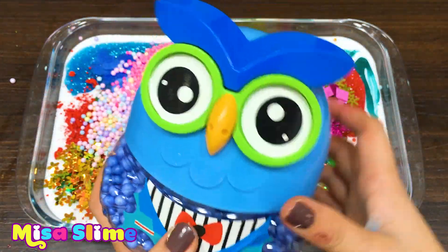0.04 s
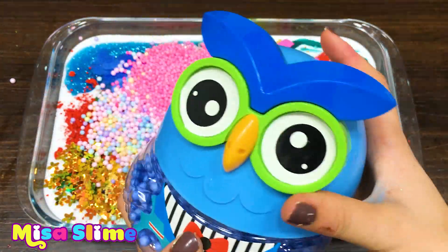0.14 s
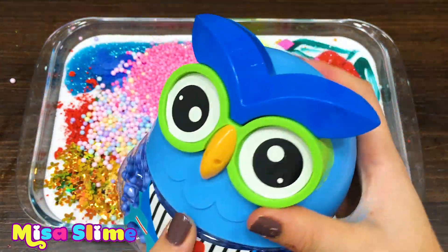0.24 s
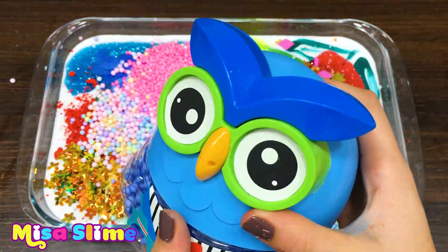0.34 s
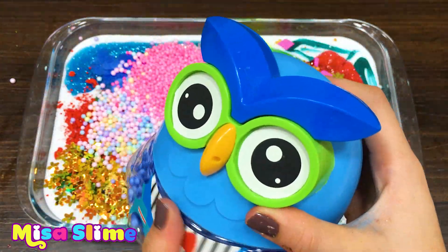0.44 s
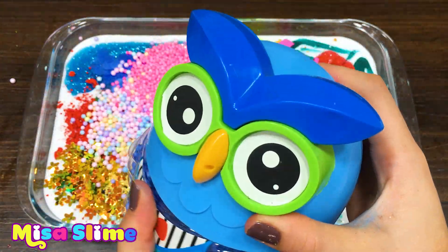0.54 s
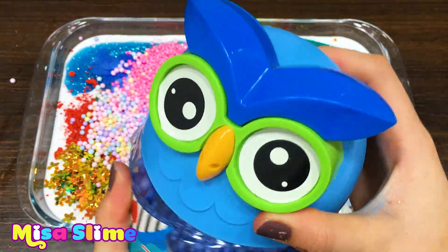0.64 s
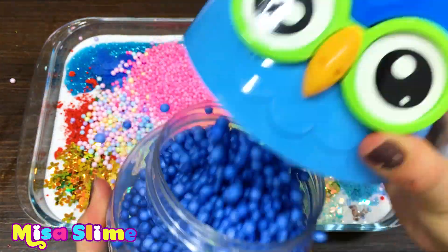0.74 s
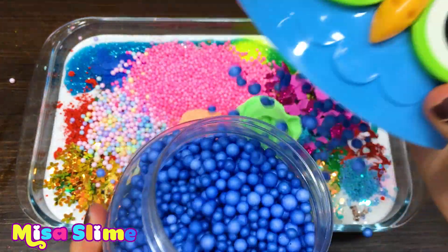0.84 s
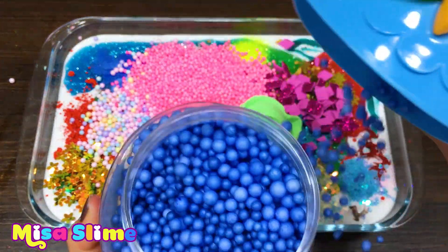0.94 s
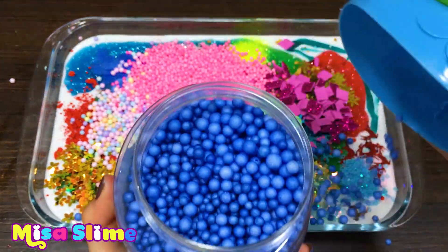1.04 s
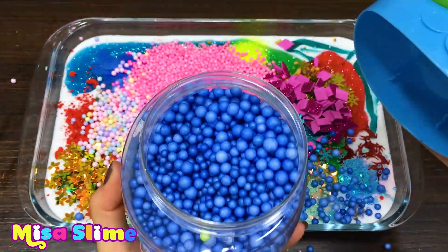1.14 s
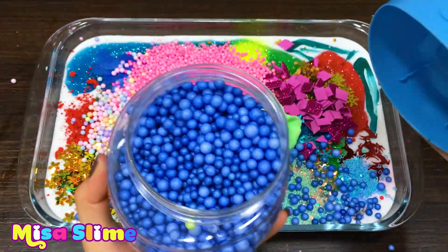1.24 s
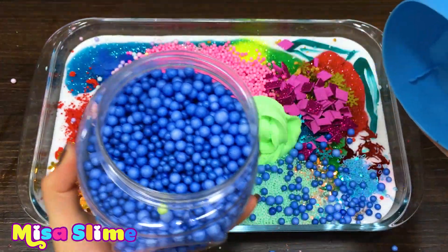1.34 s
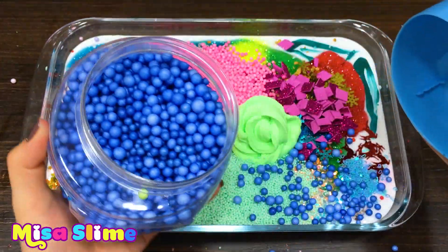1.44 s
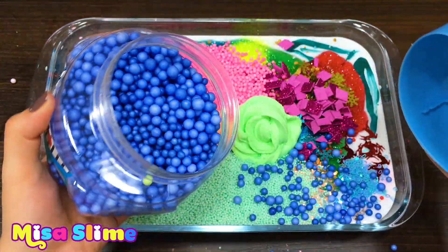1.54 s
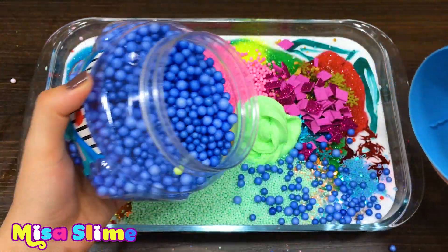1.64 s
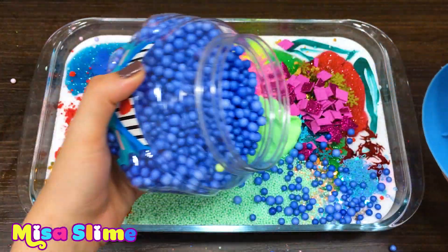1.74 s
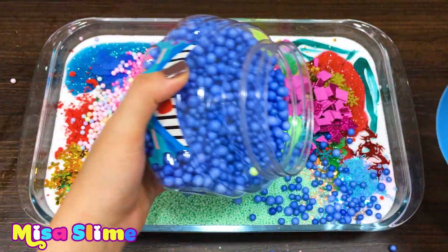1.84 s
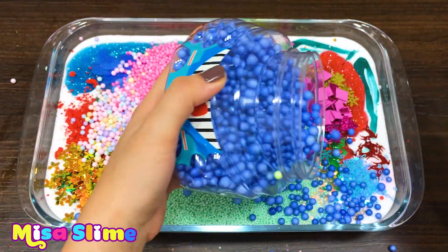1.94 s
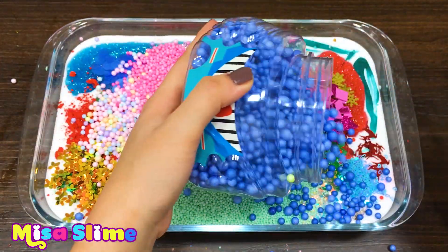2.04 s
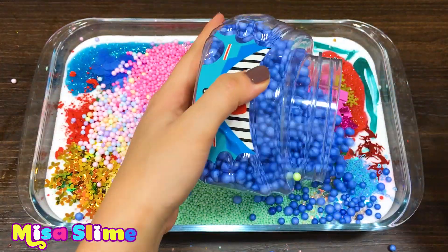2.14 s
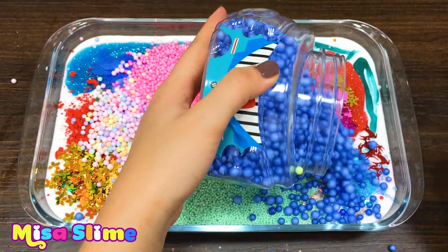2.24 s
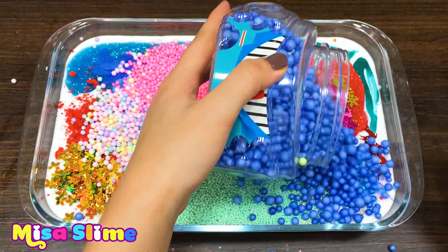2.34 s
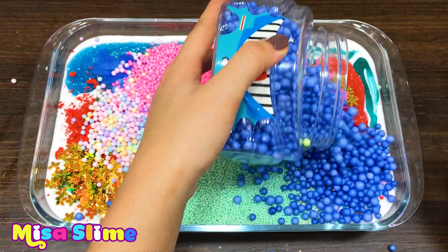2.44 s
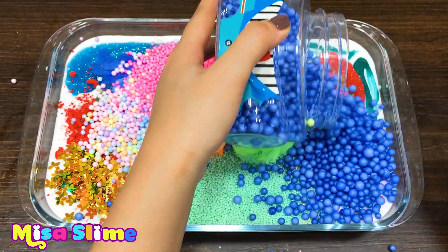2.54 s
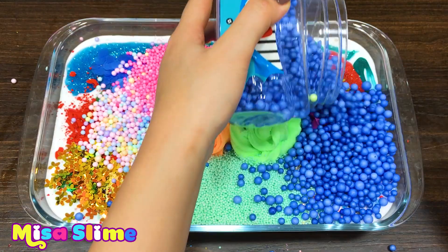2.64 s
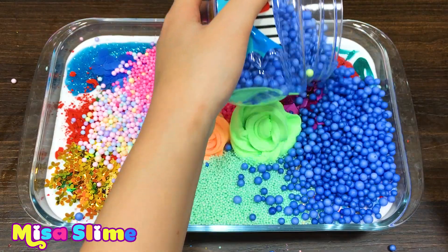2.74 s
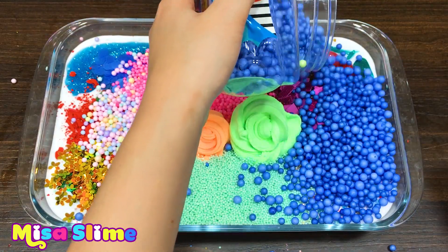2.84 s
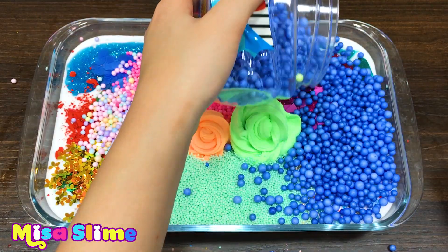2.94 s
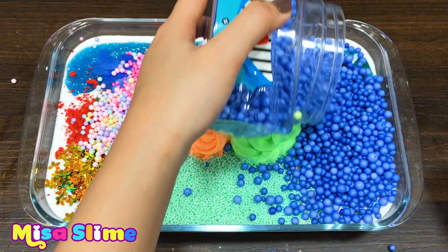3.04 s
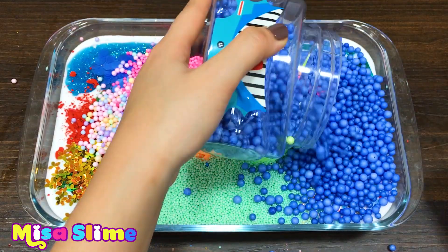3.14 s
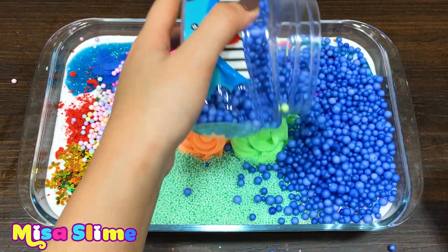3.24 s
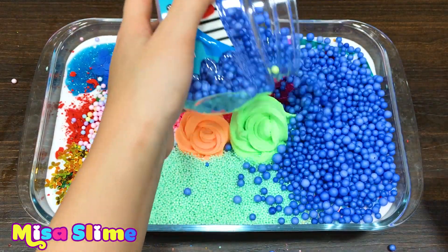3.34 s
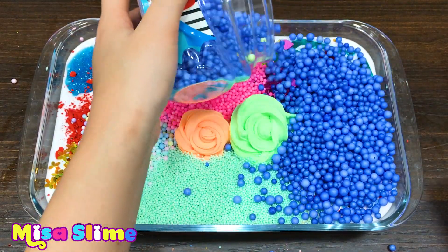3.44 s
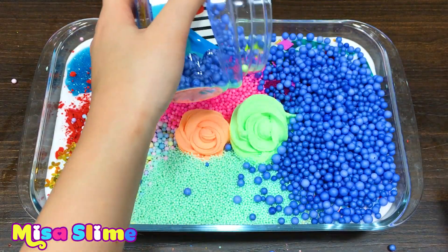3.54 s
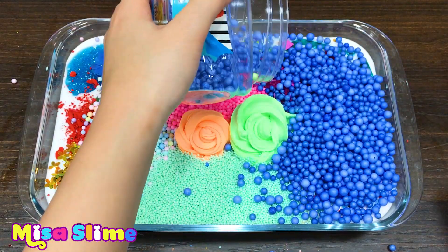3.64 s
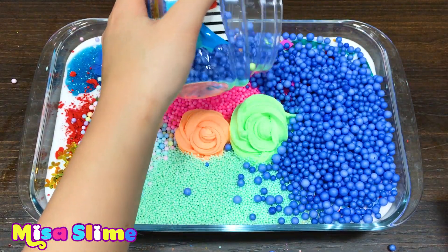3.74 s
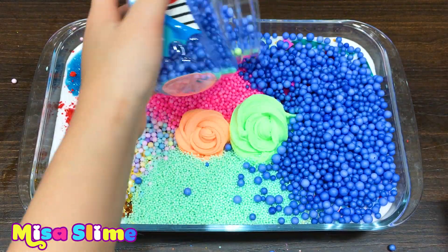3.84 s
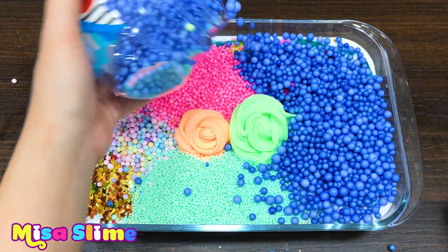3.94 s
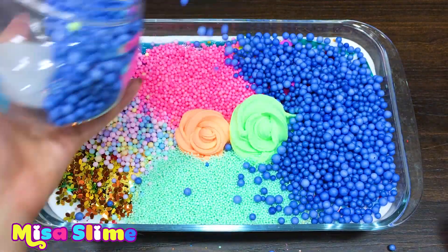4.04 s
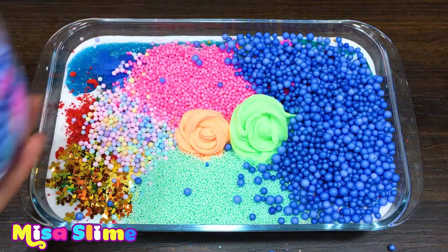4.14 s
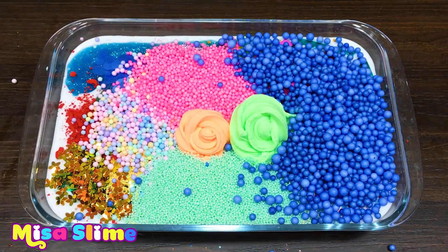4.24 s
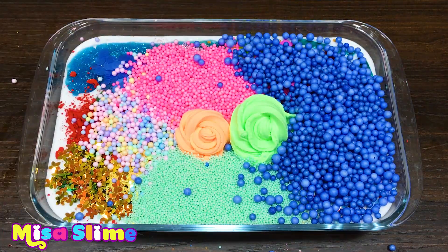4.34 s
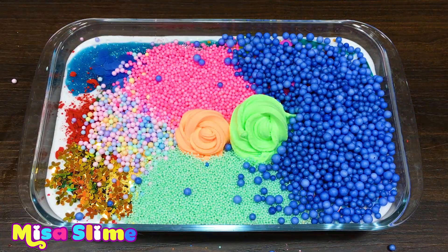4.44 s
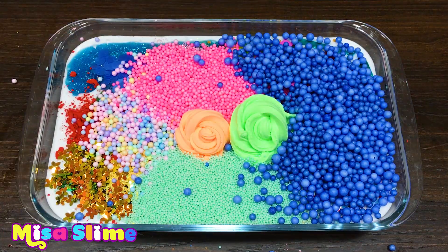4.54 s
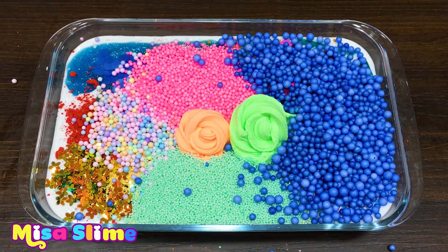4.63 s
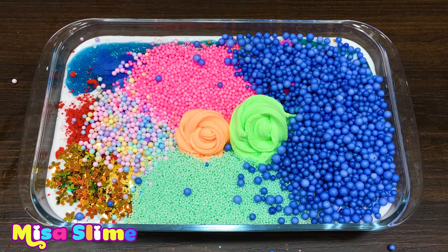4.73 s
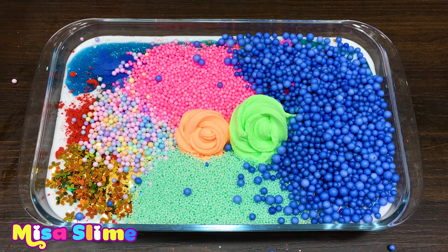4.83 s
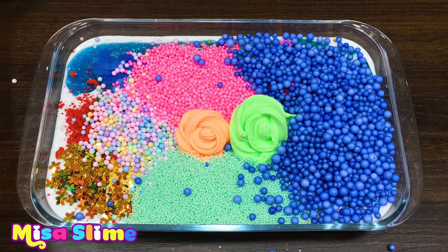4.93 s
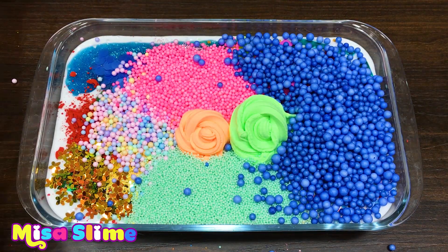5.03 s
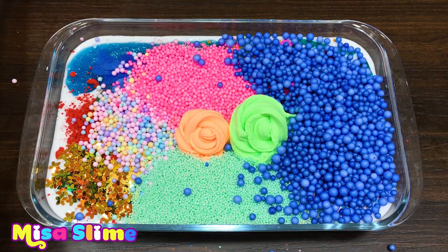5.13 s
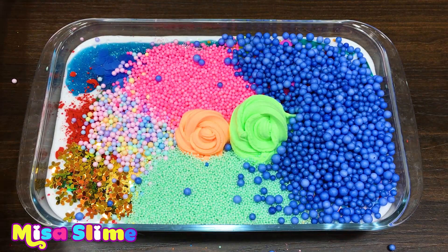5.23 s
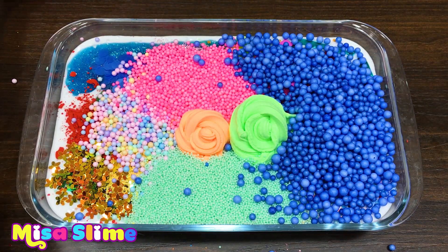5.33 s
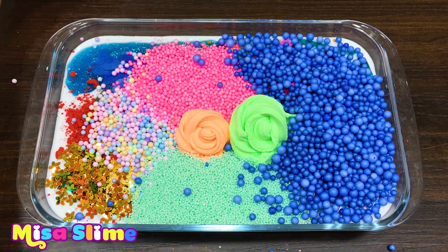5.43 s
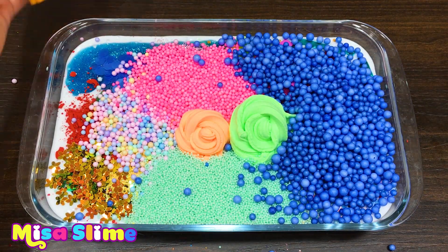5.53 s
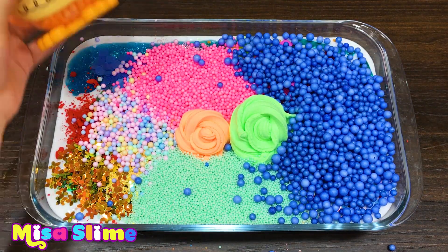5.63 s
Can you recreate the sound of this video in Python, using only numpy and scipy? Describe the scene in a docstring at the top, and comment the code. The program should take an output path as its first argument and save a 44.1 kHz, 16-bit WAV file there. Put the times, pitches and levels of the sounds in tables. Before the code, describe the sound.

Fingers rub a plastic jar, and its lid creaks, catches and comes off with two loud, hollow snaps. Small foam beads rustle and tick inside, then pour onto soft slime in a fine hiss with faint squeaks. The remaining beads slide back, the jar judders lightly onto a table, and something scrapes briefly. The microphone is close, in a bare, echoing room.

```python
"""A plastic jar of foam beads is handled close to a microphone in a bare, echoing room.
First fingers rub the plastic, and the lid creaks, catches on the rim and snaps off, ringing the jar.
Next the beads rustle and squeak, then pour onto soft slime: thousands of tiny clicks make a fine hiss.
Then the jar is swung upright and set down to one side, where its base judders to rest.
Last, something scrapes over the table. Soft room air and a low rumble lie under it all."""
import sys
import numpy as np
from scipy import signal
from scipy.io import wavfile
from scipy.ndimage import uniform_filter1d

SR = 44100
rng = np.random.default_rng(int(sys.argv[2]) if len(sys.argv) > 2 else 0)


def int16_out(signal):
    """Quantize to a 16-bit WAV file."""
    q = np.round(np.clip(np.atleast_2d(signal).T, -1, 1) * 32767)
    wavfile.write(sys.argv[1], SR, q.astype(np.int16))


N = 250488
TIME = np.arange(N) / SR

# Levels in the tables are relative. A ring time is how long a note takes to fade by 60 dB.
# the lid catching on the rim: (time [s], shell ring [dB], crack [dB], air thump [dB], shell pitch [x])
LID_SNAPS = [(0.5031, -40.5, -31.5, -67.5, 1.1), (.533, -39.5, -31, -70, 0.92),
             (0.5522, -42.5, -36, -69, 1.05), (.6074, -12, -23, -45, .95), (0.6132, 0, .5, -12, 1.0),
             (0.7744, -19.5, -34.5, -15.5, 0.94), (.784, -22.5, -32, -25.5, 0.81),
             (0.8161, -18, -29, -15, .99), (.8400, -5, -4.5, -9, .98), (0.844, -13, -14, -22.5, .93)]
LID_OFF_S = .83  # from here on, snaps ring the open mouth more than the air under the lid
# notes of the lid's shell, the air under it and the open jar: (pitch [Hz], level [dB], ring time [s])
SHELL_NOTES = [(890, -19, 0.012), (1176, 2.5, 0.03), (1312, -2, 0.035), (1540, -3.5, 0.022),
               (1783, 1, 0.04), (2167, -7, 0.054), (2400, -9.5, 0.043), (2810, -9, 0.052),
               (3120, -5, 0.0081), (3500, -15.5, 0.034), (4740, -10.5, 0.023), (5260, -7.5, 0.024),
               (7920, -13, 0.022), (10150, -11, .006)]
TRAPPED_AIR_NOTES = [(278, -5, 0.047), (370, 0.5, 0.064), (417, -6.5, 0.051), (491, -10.5, 0.11)]
MOUTH_NOTES = [(411, -2.5, 0.096), (508, -11.5, 0.13), (641.8, 2, 0.11), (730, -8.5, 0.094)]
# tone of the cracking plastic: (frequency [Hz], level [dB])
CRACK_TONE = [(200, -14), (700, -5), (1000, -3), (1400, 0), (3000, -1), (3900, -6.5), (5200, -4.5),
              (8000, -4.5), (12000, -11.5), (16000, -21)]

# beads sliding as the jar is gripped, jolted, tipped, shaken or righted:
# (time [s], rise [s], hold [s], fade [dB/s], hiss [dB], jar ring [dB])
BEAD_SLIDES = [(-.1, .1, .1, 40, -73, -70.5), (.25, .19, .01, 190, -56, -70), (.6, .05, .56, 105, -51, -68),
               (1.77, .4, 1.36, 50, -61, -64), (3.77, .09, .16, 48, -61, -66),
               (4.173, 0.2, .1, 64.5, -54, -57.5), (4.85, .2, .25, 40.5, -72, -71)]
POUR_S, POUR_DB, THINNING_DB_PER_S = 2.177, -51.5, 4  # the stream thins as the jar empties
SURGE_DB, SURGES_PER_S = 0.56, 35  # beads leave the mouth in small surges
STRAYS_PER_S, STRAY_DB, BARE_WALL_DB = 55, -9.5, 5  # stray ticks in the rustle, louder in the empty jar
# tone of the beads' hiss and of the stray ticks: (frequency [Hz], level [dB])
HISS_TONE = [(300, -26.5), (1000, -11.5), (2000, -2.5), (2800, 2), (3500, -3.5), (4150, 1), (5500, -0.5),
             (6400, -3), (7400, 1), (10000, -4.5), (12300, 0), (13500, -6.5), (14800, -4.5), (16000, -1.5)]
STRAY_TONE = [(500, -18.5), (2000, -7.5), (7000, 0), (12000, -2), (16000, -6.5)]
# notes of the jar when full and when nearly empty: (pitch [Hz], level [dB], ring time [s])
FULL_JAR_NOTES = [(890, 2.5, 0.017), (1290, 2, 0.018), (1941.5, 10, 0.0042)]
EMPTY_JAR_NOTES = [(327, -11.5, 0.022), (816, -6.5, 0.016), (1276, -8, 0.032), (2250, -12, 0.01),
                   (2900, 2.5, 0.0038)]
# the loudest beads hitting the jar: (time [s], level [dB], pitch [Hz])
BEAD_TICKS = [(1.189, -28, 5580), (1.2405, -29.5, 6780), (1.3088, -32.5, 5900), (1.3851, -37, 7000),
              (1.7704, -45, 12000), (3.5334, -28.5, 4800), (4.1106, -35, 12000), (4.197, -31, 11200),
              (4.2457, -30, 10600), (4.3119, -32, 12050), (4.3725, -34, 10800), (4.4189, -26.5, 7000)]
# foam squeaking on foam and plastic: (time [s], level [dB], pitch [Hz], length [s])
FOAM_SQUEAKS = [(1.407, -61, 1603, 0.034), (2.09, -65, 4340, 0.094), (2.265, -57.5, 4150, 0.081),
                (2.407, -57, 4110, 0.25), (4.324, -54, 4030, 0.029)]

# fingers shifting on the plastic: (time [s], rub [dB], low push [dB])
FINGER_RUBS = [(.147, -49, -52.5), (0.1574, -33, -50), (0.269, -42, -54), (0.2818, -36, -49.5),
               (0.374, -39, -59), (.4573, -30, -38.5), (0.5916, -35, -50.5), (1.059, -29.5, -54),
               (4.6047, -43, -64), (4.983, -50, -64)]
# the jar's base touching the table: (time [s], level [dB])
BASE_TOUCHES = [(4.605, -57), (4.711, -52.5), (4.737, -54.5)]
# notes of the jar's base: (pitch [Hz], level [dB], ring time [s])
BASE_NOTES = [(475, -6.5, 0.027), (824, -10, 0.018), (1100, 2, 0.017), (1256, -3.5, 0.031),
              (1407, -4, 0.025), (1870, 0.5, 0.0089), (2300, -5, 0.028), (2887, 0.5, 0.0085),
              (3800, 0, 0.0041)]
# shoves that make up the scrape: (time [s], hold [s], level [dB], extra treble [dB])
SCRAPE_SHOVES = [(5.291, 0.0031, -46, 1), (5.32, .004, -46.5, 0.5), (5.337, 0.024, -49.5, -18),
                 (5.385, 0.006, -43.5, -2), (5.407, 0.025, -53, 14.5), (5.465, .003, -49.5, -9)]
# tone of the scraping surfaces: (frequency [Hz], level [dB])
SCRAPE_TONE = [(200, -4.5), (400, -8.5), (520, 1.5), (620, -3), (760, -2), (900, -6), (1250, -2),
               (2000, -2), (2700, -4.5), (4200, 1), (5700, -9.5), (7400, -2), (9500, -14), (11500, -12.5),
               (16000, -25)]
# notes of the hollow thing that scrapes: (pitch [Hz], level [dB], ring time [s])
SCRAPE_NOTES = [(773, -5.5, 0.04), (1404, -13.5, 0.03), (2030, 2.5, 0.011)]

# pushes of the arms that rumble through the table: (time [s], hold [s], level [dB])
ARM_PUSHES = [(0.263, .04, -51), (0.422, 0.009, -48), (0.8, .02, -44.5), (2.002, 0.14, -52),
              (2.273, 0.12, -60), (5.33, .3, -60)]
RUMBLE_START_DB, RUMBLE_REST_DB, SETTLE_S = -57, -67, 1.8  # the rumble between pushes calms down
# tone of the rumble, the room's air and its echo: (frequency [Hz], level [dB])
RUMBLE_TONE = [(20, -43), (35, -20.5), (48, -11), (66, 2.5), (90, -4), (130, -2.5), (200, -17.5),
               (300, -17), (600, -47.5), (2000, -81)]
AIR_TONE = [(200, -3), (400, -4), (600, -7), (850, -6), (1300, -8.5), (2200, -11.5), (5000, -15.5),
            (10000, -18), (16000, -21)]
ECHO_TONE = [(100, -4.5), (350, 2), (1000, -0.5), (2000, 0), (5000, -1), (8000, -3), (12000, -8),
             (16000, -5.5)]
# how long the room echoes: (frequency [Hz], ring time [s])
ECHO_TIMES = [(100, 0.45), (350, 0.68), (700, 0.67), (1700, 0.74), (4000, 0.68), (8000, 0.46),
              (16000, 0.92)]
AIR_DB, TREBLE_LIMIT_HZ = -66, 15950


def lid():
    """Each slip over the rim cracks, rings the shell and pumps the air; the last ones open the mouth."""
    waves, cracks, rings = np.zeros((3, N))
    for s, ring_db, crack_db, air_db, pitch_factor in LID_SNAPS:
        thump_db, pop_db = (air_db, air_db - 17.5) if s < LID_OFF_S else (air_db - 14.5, air_db)
        chatter = burst(decay_s=0.0012) + amp(-17) * burst(decay_s=0.0099)  # the rim skids and rattles
        add(waves, s, amp(crack_db - 5.5) * bending_wave(travel_s=.005))
        add(cracks, s, amp(crack_db + 1.5) * peak_one(colour(chatter, CRACK_TONE)))
        add(rings, s, amp(ring_db) * ring(SHELL_NOTES, pitch_factor, rise_cycles=2.7))
        add(rings, s, amp(thump_db) * ring(TRAPPED_AIR_NOTES, rise_cycles=0.88))
        add(rings, s + 0.0036, amp(pop_db) * ring(MOUTH_NOTES, rise_cycles=1.8))
    return waves, cracks, rings


def bending_wave(travel_s, size=4096):
    """A click that has crossed the thin lid: treble travels fastest, 1 kHz takes about travel_s."""
    hz = np.fft.rfftfreq(size, 1 / SR)
    lag_cycles = 2 * travel_s * np.sqrt(1000 * hz) - travel_s * hz / 5
    spectrum = amp(value_at(CRACK_TONE, hz)) * np.exp(-2j * np.pi * lag_cycles)
    return peak_one(np.fft.irfft(spectrum)[:size // 2])


def beads():
    """Faster beads click more often; as the jar empties, its ring changes and stray ticks stand out."""
    stir, jar_gain = np.zeros((2, N))
    for s, rise_s, hold_s, fade_db_per_s, hiss_db, jar_db in BEAD_SLIDES:
        motion = swell(s, rise_s, hold_s, fade_db_per_s)
        stir += amp(hiss_db) * motion
        jar_gain += amp(jar_db) * motion
    flow_db = POUR_DB - THINNING_DB_PER_S * (TIME - POUR_S) + SURGE_DB * wander(SURGES_PER_S)
    flow = amp(flow_db) * swell(POUR_S, rise_s=0.27, hold_s=1.115, fade_db_per_s=42)
    emptiness = np.clip((TIME - 2.4) / 1.68, 0, 1)
    stirred = stir * collisions(per_s=1500 + 16000 * stir / stir.max(), spread_db=3, clump_db=1.5,
                                wall_per_s=700, wall_db=-5)
    poured = flow * collisions(per_s=800 + 14000 * flow / flow.max(), spread_db=4, clump_db=1.3,
                               wall_per_s=900 - 600 * emptiness, wall_db=-3)
    knocks = tiny_hits(per_s=3000, spread_db=3)
    jar = np.sqrt(1 - emptiness) * through(knocks, ring(FULL_JAR_NOTES))
    jar += np.sqrt(emptiness) * through(knocks, ring(EMPTY_JAR_NOTES))
    strays = through(tiny_hits(STRAYS_PER_S, spread_db=1.5), burst(decay_s=0.00051))
    stray_gain = amp(STRAY_DB + BARE_WALL_DB * emptiness) * (stir + amp(-3.5) * flow)
    return stirred + amp(1.5) * poured + jar_gain * jar + stray_gain * colour(strays, STRAY_TONE)


def collisions(per_s, spread_db, clump_db, wall_per_s, wall_db, bead_sizes=12):
    """Beads of many sizes click against one another in little clumps, each size at its own pitch."""
    t = np.arange(128) / SR
    clicks = np.zeros(N)
    for hz in np.linspace(1500, 16000, bead_sizes):
        ping = np.exp(-t / 0.00026) * np.cos(2 * np.pi * hz * t)
        clicks += through(tiny_hits(per_s / bead_sizes, spread_db), ping)
    wall_hits = amp(wall_db) * tiny_hits(wall_per_s, spread_db)  # sharp, with no pitch of their own
    hiss = colour(power_one(clicks) + wall_hits, HISS_TONE)
    return power_one(hiss * amp(clump_db * wander(per_s=340)))


def bead_ticks():
    """Single beads hit the jar: a very short click with a faint rattle after it."""
    out = np.zeros(N)
    for s, db, hz in BEAD_TICKS:
        click = burst(decay_s=0.00051) + amp(-12.5) * burst(decay_s=0.0024)
        tone = [(hz / 12, -18), (hz / 3, -7), (hz, 0), (hz * 2, -3), (hz * 4, -9)]
        add(out, s + 0.00067, amp(db - 2.5) * peak_one(colour(click, tone)))
    return out


def foam_squeaks():
    """Pressed beads stick and slip in a brief, grainy whistle."""
    out = np.zeros(N)
    for s, db, hz, length_s in FOAM_SQUEAKS:
        fade_in_out = np.hanning(round(length_s * SR))
        slips = tiny_hits(per_s=990, spread_db=6)[:len(fade_in_out)]
        whistle = power_one(through(slips, ring([(hz, 0, .007)])))
        add(out, s, amp(db) * fade_in_out * whistle)
    return out


def fingers():
    """Skin slips briefly on the plastic, each time giving the jar a soft push."""
    out = np.zeros(N)
    skin_tone = [(150, -7), (400, 7), (800, -1.5), (1400, 4), (2500, -5.5), (6000, -13), (16000, -24)]
    push = ring([(97, -2, 0.15), (152, -3, 0.018), (225, 2, 0.044)], rise_cycles=0.12)
    for s, rub_db, push_db in FINGER_RUBS:
        add(out, s, amp(rub_db) * peak_one(colour(burst(decay_s=.0045), skin_tone)))
        add(out, s, amp(push_db) * push)
    return out


def set_down():
    """The jar's base meets the table and judders to rest."""
    pressure = sum(amp(db) * swell(s, rise_s=.005, hold_s=0.015, fade_db_per_s=300)
                   for s, db in BASE_TOUCHES)
    return pressure * through(tiny_hits(per_s=2700, spread_db=1), ring(BASE_NOTES))


def scrape():
    """Something hollow sticks and slips over the table in dense clicks, brighter in the faster shoves."""
    slips = colour(tiny_hits(per_s=12000, spread_db=2), SCRAPE_TONE)
    body = amp(-6) * through(tiny_hits(per_s=1700, spread_db=-0.5), ring(SCRAPE_NOTES))
    dull = signal.sosfilt(signal.butter(1, 7000, fs=SR, output="sos"), slips)
    treble = slips - dull
    out = np.zeros(N)
    for s, hold_s, db, treble_db in SCRAPE_SHOVES:
        shove = amp(db) * swell(s, rise_s=.008, hold_s=hold_s, fade_db_per_s=480)
        out += shove * (body + dull + amp(treble_db) * treble)
    return out


def background():
    """Steady room air, and a low rumble that swells each time the arms push on the table."""
    air, rumble = rng.standard_normal((2, N))
    calm = amp(RUMBLE_REST_DB + (RUMBLE_START_DB - RUMBLE_REST_DB) * np.exp(-TIME / SETTLE_S))
    pushes = sum(amp(db) * swell(s, rise_s=0.031, hold_s=hold_s, fade_db_per_s=128.5)
                 for s, hold_s, db in ARM_PUSHES)
    rumble = np.hypot(calm, pushes) * colour(rumble, RUMBLE_TONE, size=16384)
    return amp(AIR_DB) * colour(air, AIR_TONE) + rumble


def room(x, delay_s=.007):
    """Hard walls send back dense echoes, and each frequency dies away at its own speed."""
    bounces = rng.standard_normal(SR) * (rng.random(SR) < 5000 / SR) * (TIME[:SR] > delay_s)
    hz, t, bands = signal.stft(bounces, SR, nperseg=256)
    fade = amp(-60 * t / value_at(ECHO_TIMES, hz)[:, None])
    tail = signal.istft(bands * fade, SR, nperseg=256)[1]
    return through(x, colour(tail, ECHO_TONE))


def ring(notes, pitch_factor=1, rise_cycles=0.61, size=8192):
    """The fading notes of a struck object; each needs some cycles to build, so low ones come last."""
    t = np.arange(size) / SR
    out = np.zeros(size)
    for k, (hz, db, ring_s) in enumerate(notes):
        build_up = 1 - np.exp(-(hz * t / rise_cycles) ** 2)
        wave = (-1) ** k * np.sin(2 * np.pi * hz * pitch_factor * t)
        out += amp(db - 60 * t / ring_s) * build_up * wave
    return peak_one(out)


def tiny_hits(per_s, spread_db, size_limit=4):
    """Random tiny impacts, their levels scattered by spread_db; average power 1."""
    chance = rng.random(N) * SR / np.maximum(per_s, 1)
    at = np.flatnonzero(chance < 1)
    out = np.zeros(N)
    out[at] = (-1) ** at * amp(spread_db * np.minimum(-np.log(chance[at]), size_limit))
    return power_one(out / np.sqrt(np.maximum(per_s, 1)))  # more hits sound denser, not louder


def burst(decay_s, size=4096):
    """A dying puff of noise."""
    return rng.standard_normal(size) * np.exp(-np.arange(size) / SR / decay_s)


def swell(s, rise_s, hold_s, fade_db_per_s):
    """The loudness of one movement: a smooth rise from time s, a hold, then a steady fade."""
    rise = np.sin(np.pi / 2 * np.clip((TIME - s) / rise_s, 0, 1)) ** 2
    return rise * amp(-fade_db_per_s * np.clip(TIME - s - rise_s - hold_s, 0, 2))


def wander(per_s):
    """A smooth random drift, typically about 1 in size."""
    width = max(int(SR / per_s), 1)
    return power_one(uniform_filter1d(uniform_filter1d(rng.standard_normal(N), width), width))


def colour(x, tone, size=2048):
    """Gives x a tone, listed as (frequency [Hz], level [dB]), without smearing it back in time."""
    log_gain = np.log(amp(value_at(tone, abs(np.fft.fftfreq(size, 1 / SR)))))
    spectrum = np.exp(np.conj(signal.hilbert(log_gain)))
    return through(x, np.fft.ifft(spectrum).real[:size // 2])


def through(x, response):
    """Every sample of x sets off a copy of the response, which is scaled to energy 1."""
    return signal.oaconvolve(x, response / np.linalg.norm(response))[:len(x)]


def value_at(points, hz):
    """Reads between the rows of a frequency table, with octaves evenly spaced."""
    frequencies, values = np.transpose(points)
    return np.interp(np.log(hz + 1), np.log(frequencies + 1), values)


def add(mix, s, sound):
    """Mixes a sound in at time s."""
    part = mix[round(s * SR):][:len(sound)]
    part += sound[:len(part)]


def amp(db):
    """Turns decibels into a multiplier."""
    return 10 ** (np.asarray(db) / 20)


def power_one(x):
    """Scales to an average power of 1."""
    return x / np.sqrt(np.mean(x ** 2) + 1e-20)


def peak_one(x):
    """Scales to a peak of 1."""
    return x / abs(x).max()


def scene():
    """Near sounds arrive mostly straight; those to one side come more by way of the walls."""
    waves, cracks, rings = lid()
    handling = fingers() + bead_ticks()
    rustle = beads() + foam_squeaks()
    landing, scraping = set_down(), scrape()
    direct = waves + cracks + rings + handling + rustle + amp(-1) * landing + amp(-0.5) * scraping
    near_to_walls = amp(-10.5) * cracks + amp(-13) * rings + amp(-8) * handling + amp(-11) * rustle
    side_to_walls = amp(-6) * landing + amp(-6.5) * scraping
    echo = room(near_to_walls + side_to_walls)
    lid_echo = room(amp(-4.5) * waves)  # the whole lid sends out its clicks, along other paths
    return (direct + echo + lid_echo + background())[None]


def record(dry):
    """The microphone loses deep bass, the loudest snap overloads it, and the highest treble is cut."""
    thinned = signal.sosfilt(signal.butter(3, 45, "high", fs=SR, output="sos"), dry)
    clipped = np.clip(thinned, -1, 1)
    treble_cut = signal.firwin(511, TREBLE_LIMIT_HZ, window=("kaiser", 8), fs=SR)
    return signal.oaconvolve(clipped, treble_cut[None], "same")


dry = scene()
out = record(dry)
int16_out(out)
```